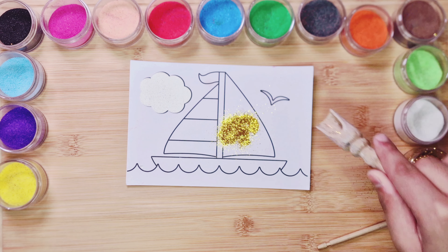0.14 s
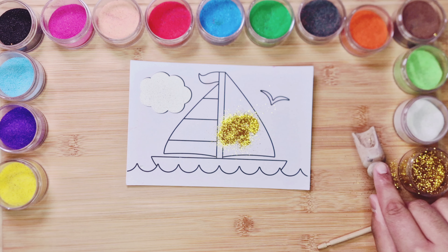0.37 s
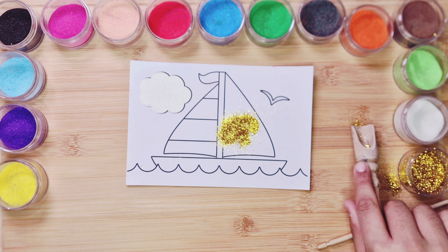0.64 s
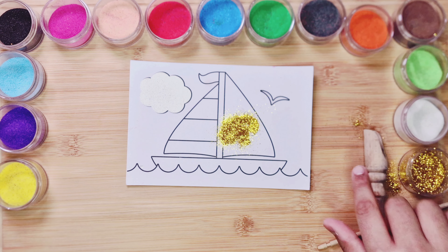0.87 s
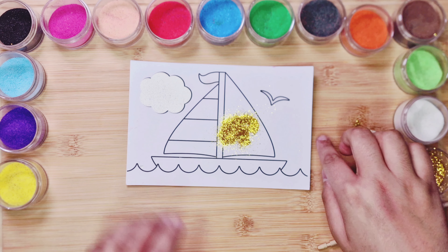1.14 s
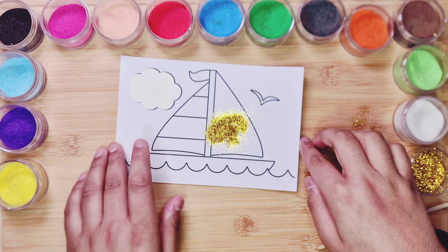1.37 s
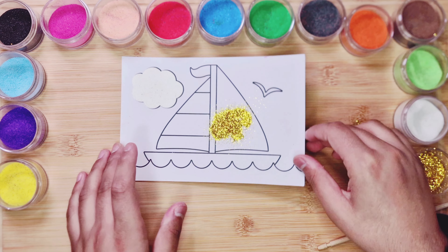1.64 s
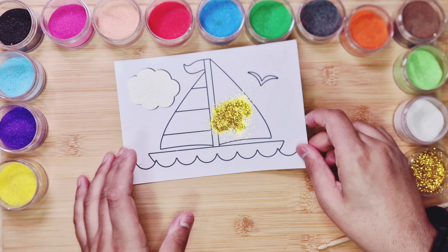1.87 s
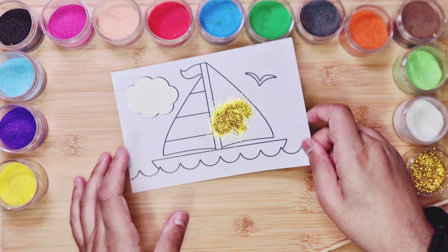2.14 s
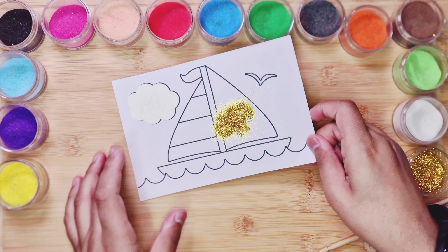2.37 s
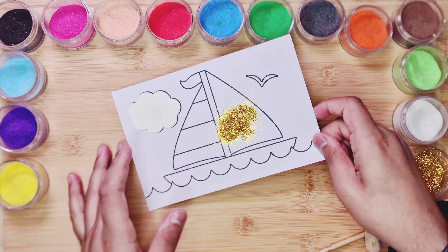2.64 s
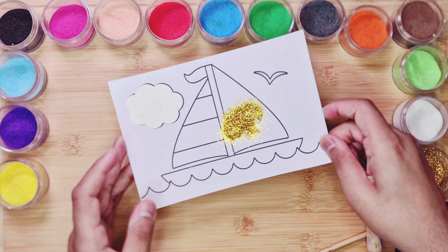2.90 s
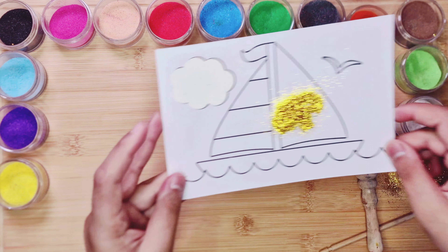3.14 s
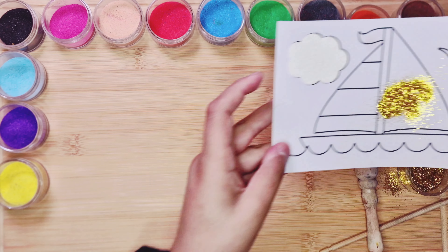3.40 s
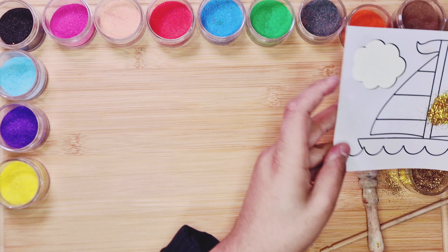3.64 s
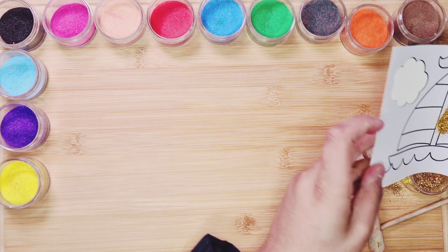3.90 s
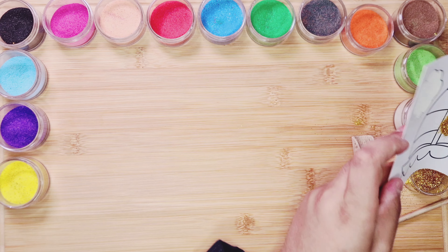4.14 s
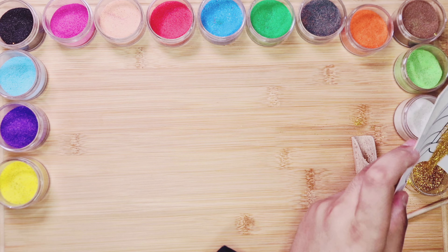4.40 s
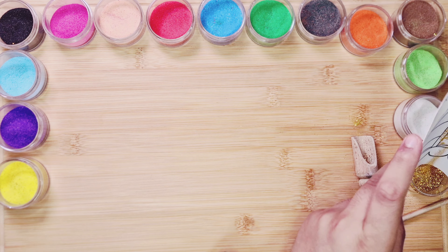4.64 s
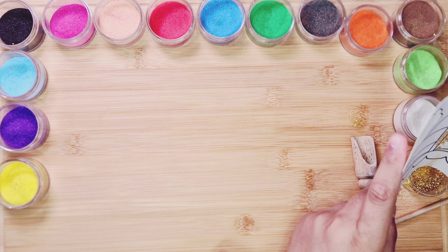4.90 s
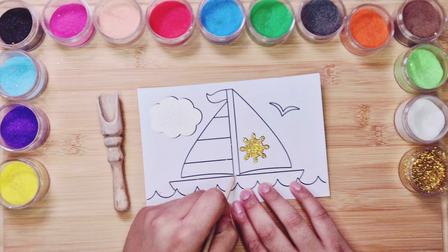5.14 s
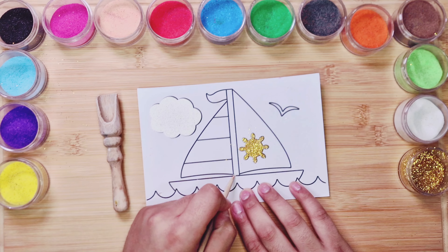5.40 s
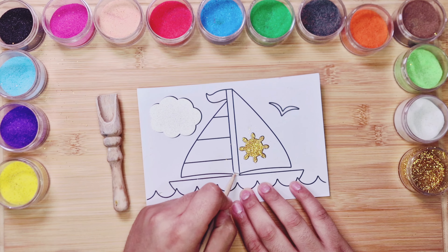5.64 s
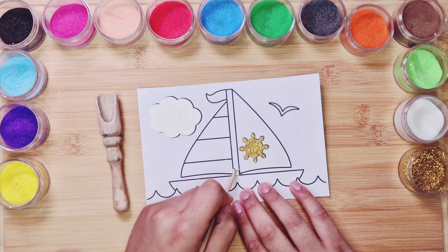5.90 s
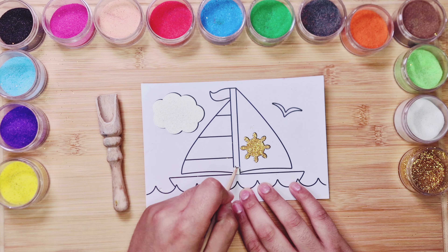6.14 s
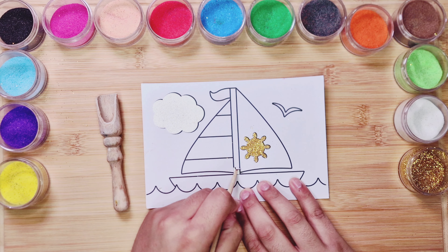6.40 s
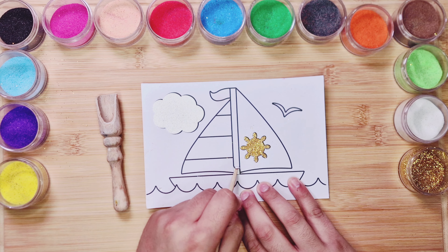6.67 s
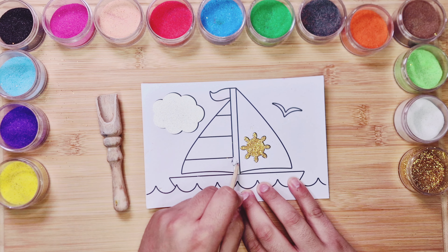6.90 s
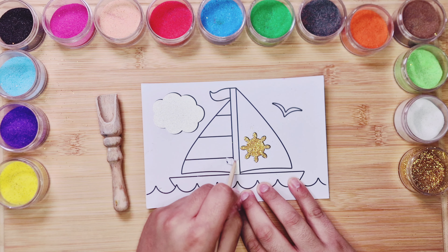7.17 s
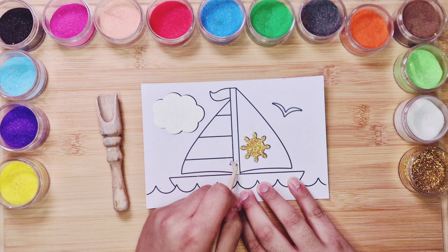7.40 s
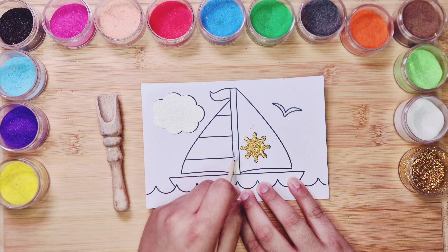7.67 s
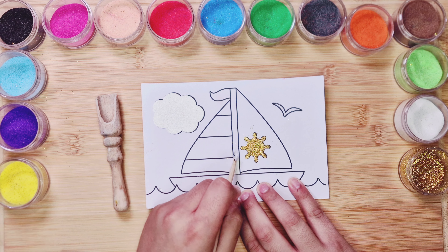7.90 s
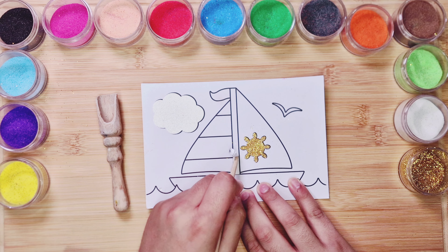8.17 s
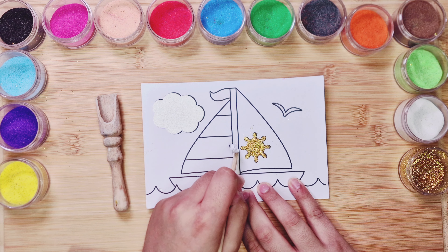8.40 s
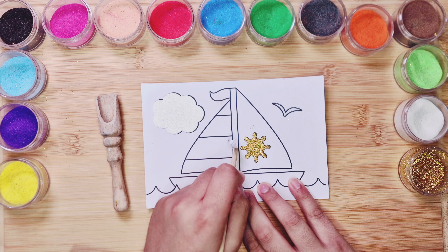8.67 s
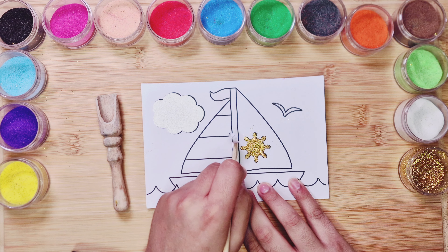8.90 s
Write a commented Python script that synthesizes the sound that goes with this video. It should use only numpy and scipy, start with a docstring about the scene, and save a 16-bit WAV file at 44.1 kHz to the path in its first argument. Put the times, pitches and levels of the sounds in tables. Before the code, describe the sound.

In a small quiet room with a thin, slightly wavering mid-pitched hum, faint air and low table rumble, a wooden scoop lightly touches a bamboo board at 0.6 s. At 0.8 s it lands with a loud, bright, hard knock, rattling rapidly to rest by 0.95 s, with soft thumps near 1.0 s. From 1.2 to 1.8 s fingers brush and pry at stiff card with crisp little snaps. Faint shifts and buckles follow; around 3.1 s the card flicks free with a snap and a soft swish. Between 4.4 and 5.2 s it is tipped and shaken: light rustles, a ringing buckle at 4.7 s. A dry pop at 5.25 s ends the rustling abruptly. Then near quiet: small ticks at 5.6-5.9 s, dull stick taps at 6.6-7.0 s, subtle scrapes, a crisp snap at 8.5 s and a fading faint rub. Close stereo pickup.

```python
"""A wooden scoop is set down on a bamboo board and rattles to rest: each touch rings its decaying modes.
Hands lift a stiff card, tip it, and later pick at its paper layer with a stick: shaped noise makes the
rustles, snaps and scrapes, and short ringing notes make card buckles and stick taps. Soft thumps and a dry
pop join in. Behind them lies a small quiet room with a thin hum that wavers a little, low rumble through
the table and faint air, heard by a close pair of microphones."""
import sys
import numpy as np
from scipy import signal
from scipy.fft import rfft, irfft
from scipy.io import wavfile
from scipy.ndimage import uniform_filter1d

SR = 44100
rng = np.random.default_rng(int(sys.argv[2]) if len(sys.argv) > 2 else 0)


def gain_from_db(level_db):
    """Convert decibel levels to linear amplitude factors (20 dB per decade)."""
    decades = np.asarray(level_db, float) / 20
    return 10 ** decades


def dump_mix(stems):
    """Bounce the given channels to the path in sys.argv[1] as a 16-bit WAV at rate SR."""
    frames = np.atleast_2d(stems).T  # one column per channel
    limited = np.clip(frames, -1, 1)  # hard clip at full scale
    pcm = np.round(limited * 32767).astype(np.int16)
    wavfile.write(sys.argv[1], SR, pcm)


N = 398663  # length in samples


def evened(x):
    """Scales a signal to an rms of 1."""
    return x / np.sqrt(np.mean(x ** 2) + 1e-20)


def read(points, hz):
    """Reads a table of (Hz, value) between its rows, on a log-frequency axis."""
    f, value = np.transpose(points)
    return np.interp(np.log(hz + 1), np.log(f + 1), value)


def add(mix, s, sound):
    """Lays a sound into the mix at time s in seconds."""
    part = mix[round(s * SR):][:len(sound)]
    part += sound[:len(part)]


def ring(modes, tilt_db, pivot_hz, rise_turns, t):
    """Decaying modes of joint peak 1, low ones slower to build; each spot of contact varies them a little."""
    hz, db, t60 = np.transpose(modes)[:, :, None]
    spot_db, shift = rng.standard_normal((2,) + hz.shape)
    tilted_db = db + 2.2 * spot_db + tilt_db * np.log2(hz / pivot_hz)
    fading_db = tilted_db - 60 * t / t60
    hz = hz * (1 + 0.004 * shift)
    rise = np.minimum(t * hz / rise_turns, 1)
    tone = (gain_from_db(fading_db) * rise * np.sin(2 * np.pi * hz * t)).sum(0)
    return tone / abs(tone).max()


# The scoop touching the board. Each row: start in seconds, level in dB,
# hardness in dB per octave, level of the bright crack against the ring in dB.
KNOCKS = [(0.561, -11.5, -5, -27), (0.819, 1, 6, -6), (0.829, -4.5, 14, -22), (0.864, -11.5, 8.5, -18),
          (0.875, -12, 6.5, -4), (0.8904, -12.5, -1, 1), (0.925, -20, -1.5, -8.5)]
# The ringing of the scoop. Each row: pitch in Hz, level in dB, time to fall by 60 dB in seconds.
WOOD = [(1036, -2, 0.022), (1130, -1, 0.022), (1421, -1, 0.03), (1774, -0.5, 0.023), (2200, -7, 0.025),
        (2860, -7.5, 0.04), (3610, -5, 0.035), (3770, -3.5, 0.027), (4200, -1.5, 0.01)]


def scoop():
    """Each touch rings the wood; harder touches favour the high modes, and a noise crack is added."""
    mix, t = np.zeros(N), np.arange(4000) / SR
    for s, level_db, hard_db, crack_db in KNOCKS:
        hiss = signal.lfilter([1, 0, -1], 1, rng.standard_normal(len(t)))
        crack = hiss * gain_from_db(crack_db - 60 * t / 0.0095)  # falls by 60 dB in 9.5 ms
        attack = np.minimum(t / 0.00035, 1)
        add(mix, s, gain_from_db(level_db) * (ring(WOOD, hard_db, 2000, 0.41, t) + crack) * attack)
    return mix


# What the hands do: the scoop slides to rest, fingers brush the board, a nail pries at the card's edge,
# the card turns, its edge flicks free, it is lifted, bends over, is tipped and shaken, the stick feels
# for the layer, its tip catches, fingers press the card down, the stick works under the layer, it lets go.
# Each row: start in seconds, narrowness around the middle in dB, bite from body to edge in dB,
# left-right balance in dB.
STAGES = [(0, 4, -4, -2), (1.1, 12.5, 4.5, -3), (1.29, 17, 14.5, -1), (1.7, 7, 0.5, -3.5),
          (3.001, 13, -1, -2), (3.15, 8, 0.5, -4), (4.0, 8.5, -13.5, -4.5), (4.3, 5.5, -2, -3),
          (5.5, 15, -6.5, -2.5), (5.75, 8.5, 0, -7.5), (6.5, 6, -9.5, -4), (7.12, 7, 0, -4.5),
          (8.45, 4.5, 7.5, -7.5)]


def stage(s):
    """Narrowness, bite and left-right balance of the action under way at time s."""
    rows = np.transpose(STAGES)
    return rows[1:, np.searchsorted(rows[0], s, "right") - 1]


# The basic colour of the card's paper. Each row: frequency in Hz, level in dB per Hz.
PAPER = [(100, -24), (300, -13), (700, -8.5), (1100, -7.5), (1600, -3.5), (2700, -12), (3800, -9),
         (4350, -3), (5000, -15), (7000, -17.5), (16000, -18)]


def paper_db(hz, narrow_db, bite_db):
    """Colour of the card: bite trades low body for crisp edge, narrowness lowers both and lifts the peak."""
    low = np.clip(np.log2(3000 / (hz + 1)) / 0.99, 0, 1)
    high = np.clip(np.log2((hz + 1) / 5500) / 0.66, 0, 1.4)
    peak = np.exp(-(np.log2((hz + 1) / 4400) / 0.1) ** 2) * 0.79 * (narrow_db - 9.0)
    body_db = low * (5.0 - narrow_db - bite_db)
    edge_db = high * (7.5 - narrow_db + bite_db)
    return read(PAPER, hz) + peak + body_db + edge_db


# Strokes of finger, card or stick sliding. Each row: start in seconds, length in seconds, level in dB.
STROKES = [(0.8, 0.18, -36), (1.177, 0.1, -48.5), (1.305, 0.071, -49), (1.51, 0.031, -57.5),
           (1.762, 0.12, -56), (2.085, 0.2, -57.5), (2.588, 0.025, -58.5), (2.875, 0.042, -61.5),
           (3.065, 0.19, -55), (3.177, 0.31, -51), (3.87, 0.037, -66), (4.1, 0.15, -66),
           (4.385, 0.072, -58.5), (4.517, 0.012, -62), (4.59, 0.038, -65), (4.668, 0.013, -54),
           (4.753, 0.14, -53.5), (4.939, 0.071, -52.5), (5.097, 0.049, -59.5), (5.223, 0.028, -65),
           (5.634, 0.082, -66), (6.096, 0.12, -75), (6.351, 0.051, -66), (6.562, 0.17, -69),
           (7.181, 0.023, -59.5), (7.673, 0.057, -65.5), (8.203, 0.33, -66.5), (8.528, 0.051, -57.5),
           (8.618, 0.55, -71.5)]
# Faint shifting in the first part of the rustle. Each row: time in seconds, level in dB.
SHIFTING = [(0, -72), (.5, -73.5), (1.16, -64), (2.4, -79), (3.6, -66.5), (4.3, -65.5), (5.1, -64)]


def rustle():
    """Dense tiny slips in clumps; each stroke rises, holds with a slight sag, and dies away."""
    stop_s = 5.157  # the rustle of the first part stops dead here
    later_db = -82.5  # level of the faint shifting from then on
    crackle_per_s = 130  # single fibres that stand out of the slips
    rise_share, sag_db_per_s, release_db_per_s = 0.39, 35, 275

    clump = evened(uniform_filter1d(rng.standard_normal(N), 150))
    fibres = rng.random(N) < crackle_per_s / SR
    clump = gain_from_db(2.2 * clump) + signal.lfilter([1], [1, -0.97], 0.6 * fibres)
    slips = rng.standard_normal((2, N)) * clump
    slips[1] = 0.6 * slips[0] + 0.68 * slips[1]  # the two sides are partly alike
    hz, t, z = signal.stft(slips / np.std(slips), SR, nperseg=256, noverlap=192)

    shifting_db = np.where(t < stop_s, np.interp(t, *np.transpose(SHIFTING)), later_db)
    power = gain_from_db(paper_db(hz[:, None], 8.2, -2.2) + shifting_db) ** 2
    for s, length, level_db in STROKES:
        end = s + length + 0.3
        if s < stop_s:
            end = min(end, stop_s)
        near = (t > s) & (t < end)
        u = t[near] - s
        fall_db = -sag_db_per_s * u - release_db_per_s * np.maximum(u - length, 0)
        shape = np.minimum(u / (rise_share * length), 1) * gain_from_db(fall_db)
        colour_db = paper_db(hz[:, None], *stage(s)[:2])
        power[:, near] += (gain_from_db(colour_db + level_db) * shape) ** 2

    # the bending sheet favours other pitches from moment to moment
    patches = uniform_filter1d(rng.standard_normal((len(t), len(hz))), size=20, axis=0)
    patches = uniform_filter1d(patches, size=4, axis=1)
    power *= gain_from_db(2 * 2.4 * evened(patches).T)  # doubled, since this scales power
    middle = np.mean(gain_from_db(read(PAPER, hz)) ** 2 * (hz > 2500) * (hz < 6000))
    return signal.istft(z * np.sqrt(power / middle), SR, nperseg=256, noverlap=192)[1][:, :N]


# Paper snaps and stick ticks. Each row: start in seconds, level in dB, bite in dB.
SNAPS = [(1.1906, -37, 11), (1.2515, -38.5, 3), (1.3364, -35, 9), (1.351, -36.5, 13), (1.3925, -35.5, 15.5),
         (1.414, -38.5, 19.5), (1.6268, -46.5, 13), (1.7984, -42.5, 7), (2.125, -51, -2), (2.2395, -47, 2),
         (3.117, -35, 6), (4.389, -49, -6), (4.4262, -44.5, -7.5), (4.6831, -40, -2.5), (5.6087, -53, -3),
         (5.8248, -47, 1), (5.897, -56, 11.5), (5.9393, -47.5, 5.5), (8.523, -57, 16), (8.541, -34, 11),
         (8.7214, -58, 7)]


def snaps():
    """A fibre or glue spot lets go, or the stick ticks: a burst of milliseconds in the card's colour."""
    mix, t, hz = np.zeros(N), np.arange(1024) / SR, np.fft.rfftfreq(1024, 1 / SR)
    for s, level_db, bite_db in SNAPS:
        burst = rng.standard_normal(1024) * (t / 0.0016) * np.exp(-t / 0.00202)
        spectrum = rfft(burst)
        snap = irfft(spectrum * gain_from_db(paper_db(hz, stage(s)[0], bite_db)))
        # the level is set against the middle band of the plain paper colour
        middle = irfft(spectrum * gain_from_db(read(PAPER, hz)) * (hz > 2500) * (hz < 6000))
        add(mix, s, gain_from_db(level_db) * snap / (4.76 * np.std(middle)))
    return mix


# Short ringing notes: the card buckles first, the stick taps on the board from 6.6 s.
# Each row: start in seconds, peak in dB, note in Hz.
SHORT_NOTES = [(2.156, -44, 1010), (2.6, -48, 1074), (3.26, -43.5, 750), (4.682, -35, 1510),
               (4.684, -46, 870), (4.97, -50, 1420), (6.613, -46.5, 1150), (6.703, -47.5, 1140),
               (6.798, -47, 1160), (6.917, -52, 1105), (7.039, -50.5, 1130), (7.19, -59, 1067)]
# The partials of each note. Each row: multiple of the note, level in dB, time to fall by 60 dB in seconds.
PARTIALS = [(1, 4, .022), (1.3, 1, 0.013), (2.5, -4.5, .012), (4.0, -4, 0.0072)]


def short_notes():
    """Card buckles and, later, stick taps on the board each ring a few quickly fading partials."""
    mix, t = np.zeros(N), np.arange(3000) / SR
    for s, peak_db, hz in SHORT_NOTES:
        modes = np.array(PARTIALS) * [hz, 1, 1]
        add(mix, s, gain_from_db(peak_db) * ring(modes, 0, hz, 2.2, t))
    return mix


# Narrow-band noises: rubs of scoop and stick, and one brief swell just before the loudest knock.
# Each row: start in seconds, length in seconds, level in dB, pitch in Hz.
NARROW_NOISES = [(0, .5, -72, 3650), (0.579, .26, -67, 3610), (.803, .024, -29, 4050),
                 (.85, .16, -36, 3660), (6.65, .13, -71, 3220), (7.242, 0.3, -76.5, 3280),
                 (7.243, .13, -72.5, 4500)]


def narrow_noises():
    """Uneven noise through one sharp resonance, swelling and fading."""
    mix = np.zeros(N)
    for s, length, db, hz in NARROW_NOISES:
        u = np.arange(0, 1, 1 / (length * SR))  # share of the noise gone by
        noise, swing = rng.standard_normal((2, SR // 2))[:, :len(u)]
        uneven = noise * gain_from_db(4.0 * evened(uniform_filter1d(swing, size=500)))
        b, a = signal.iirpeak(hz, 17, SR)
        band = signal.lfilter(b, a, signal.lfilter(b, a, uneven))  # twice, for a steeper band
        add(mix, s, gain_from_db(db) * evened(band) * np.sin(np.pi * u))
    return mix


# Scoop and hands landing on the board. Each row: start in seconds, peak in dB, firmness in dB per octave.
THUMPS = [(0.56, -43.5, 4.5), (0.822, -29, 3.5), (0.998, -32, 4), (1.015, -31, 2), (1.398, -55.5, -6),
          (2.3, -53, -4.5), (4.142, -59, 16.5), (4.388, -50, 13), (4.781, -54.5, 0), (6.613, -55, 4),
          (6.688, -47, -1), (6.799, -47.5, -5.5), (6.914, -44.5, -4), (7.039, -52, 1), (8.263, -52.5, -7.5)]
# The lowest swings of the board. Each row: pitch in Hz, level in dB, time to fall by 60 dB in seconds.
BOARD = [(43.16, -6, 0.32), (84.4, 2.5, 0.074), (122, -3, 0.2), (264, -8, 0.12), (370, -9, 0.033)]


def thumps():
    """Scoop landings and hands drive the lowest swings of the board, with a slow start."""
    mix, t = np.zeros(N), np.arange(SR // 2) / SR
    for s, peak_db, firm_db in THUMPS:
        add(mix, s, gain_from_db(peak_db) * ring(BOARD, firm_db, 120, 1.5, t))
    return mix


# One dry pop. The single row: time in seconds, level in dB, pitch in Hz.
POP = (5.2503, -24, 2300)


def pop():
    """A single short swing, broad up and sharp down, with close rebounds and no room after it."""
    s, db, hz = POP
    turn = (np.arange(N) / SR - s) * hz
    phase = np.clip(turn / np.where(turn < 0, 0.6, 0.3), -8, 8)
    swing = -gain_from_db(db) * np.where(turn < 0, 1.5, 2.3) * phase * np.exp(-phase ** 2)
    return swing + 0.2 * np.roll(swing, 85) - 0.11 * np.roll(swing, 40)


# How the room dies away. Each row: frequency in Hz, time to fall by 60 dB in seconds.
ROOM = [(200, 0.91), (700, 0.21), (2000, 0.33), (5000, 0.24), (12000, 0.16)]


def room(x):
    """Sparse echoes of random sign, each band dying at its own speed."""
    taps = np.zeros((2, SR // 2))
    at = np.arange(220, SR // 2 - 20, 12)  # samples; the first echo comes after 5 ms
    at = at + rng.integers(0, 12, (2, len(at)))
    np.put_along_axis(taps, at, rng.choice([-1., 1.], at.shape), 1)
    hz, t, z = signal.stft(taps, SR, nperseg=256)
    decay = gain_from_db(-60 * t / read(ROOM, hz)[:, None])
    tail = signal.istft(z * decay, SR, nperseg=256)[1]
    return signal.fftconvolve(x[None], tail / np.linalg.norm(tail[0]), axes=1)[:, :N]


def coloured(points, same_hz):
    """Steady noise in both microphones, alike well below same_hz and unrelated well above."""
    hz = np.fft.rfftfreq(N, 1 / SR)
    left, other = rfft(rng.standard_normal((2, N)))
    same = 1 / (1 + (hz / same_hz) ** 2)
    both = np.array([left, same * left + np.sqrt(1 - same ** 2) * other])
    return evened(irfft(both * gain_from_db(read(points, hz)), N))


# Rumble that follows how hard the arms lean on the table. Each row: time in seconds, level in dB.
RUMBLE = [(0, -69.5), (1.5, -66.5), (3.6, -71.5), (5.3, -61.5), (6.2, -65.5), (7.1, -56.5), (7.6, -69),
          (8.2, -63.5)]
# The colour of the rumble. Each row: frequency in Hz, relative level in dB per Hz.
RUMBLE_COLOUR = [(8.8, -40.5), (15, -22.5), (32, 6), (54, 1.5), (130, -10.5), (204, -27), (332, -25.5),
                 (500, -34.5), (650, -75.5)]
# The colour of the room air. Each row: frequency in Hz, relative level in dB per Hz.
AIR = [(250, -31.5), (800, -27.5), (1400, -25), (1900, -16.5), (2500, -38.5), (3300, -33.5), (4600, -38.5),
       (5400, -52), (8300, -45.5), (16000, -33)]


def background():
    """Room air and table rumble from coloured noise, and a thin sine hum that wavers a little."""
    hum_hz, hum_db, air_db = 699.7, -63, -68
    t = np.arange(N) / SR
    waver = uniform_filter1d(uniform_filter1d(rng.standard_normal(N), 3000), 3000)
    waver = evened(waver)
    hum_level = np.sqrt(2) * gain_from_db(hum_db + 0.74 * waver)
    hum = hum_level * np.sin(2 * np.pi * hum_hz * t + 0.4 * waver[::-1])  # the phase wavers too
    rumble = gain_from_db(np.interp(t, *np.transpose(RUMBLE))) * coloured(RUMBLE_COLOUR, 400)
    return gain_from_db(air_db) * coloured(AIR, 600) + rumble + hum


def scene():
    """Hands at work close by, the room behind them."""
    wood = scoop()
    details = snaps() + short_notes() + narrow_noises()
    balance_db = uniform_filter1d(stage(np.arange(N) / SR)[2], size=800)
    side = gain_from_db(np.array([[0.5], [-0.5]]) * balance_db)
    close = thumps() + pop() + side * (wood + details + rustle())
    return close + room(gain_from_db(-4.0) * wood + gain_from_db(-4.5) * details) + background()


# The shared colour of the microphones. Each row: frequency in Hz, gain in dB.
MIC = [(8100, -0.5), (9900, -11.5), (11800, 1.5), (14000, -3.5), (15500, -2.5), (16300, -28),
       (17000, -59.5)]
# How the two microphone ports differ. Each row: frequency in Hz, left minus right in dB.
PORTS = [(110, 0.5), (380, 3.5), (700, 4.5), (1290, 3.5), (2380, -0.5), (4400, -7), (8120, 12.5),
         (15000, -6.5)]


def band_limit(x):
    """A steep low-pass at the top of the band."""
    return signal.sosfilt(signal.butter(12, 17160, fs=SR, output="sos"), x)


def record(dry):
    """Two microphone ports share a treble notch but differ in colour and phase; loud peaks are rounded."""
    hz, side = np.fft.rfftfreq(N, 1 / SR), np.array([[0.5], [-0.5]])
    turn = np.exp(-1j * side * 1.86 * hz / (hz + 900))  # bass arrives together, treble out of step
    colour = gain_from_db(read(MIC, hz) + side * read(PORTS, hz))
    heard = irfft(rfft(dry) * turn * colour, N)
    finished = np.tanh(heard)
    return band_limit(finished)


dry = scene()
out = record(dry)
dump_mix(out)
```